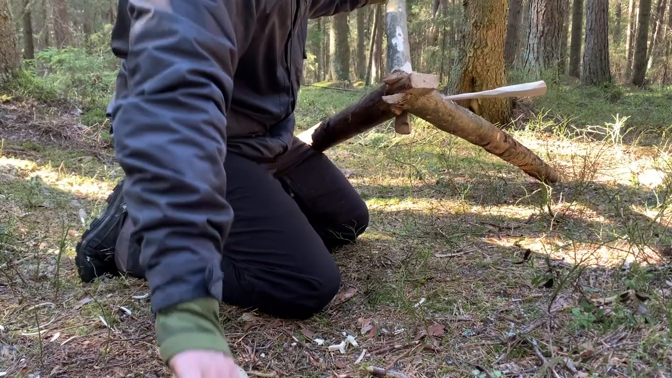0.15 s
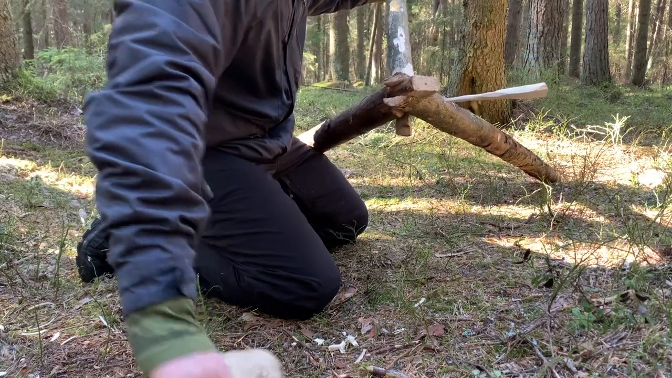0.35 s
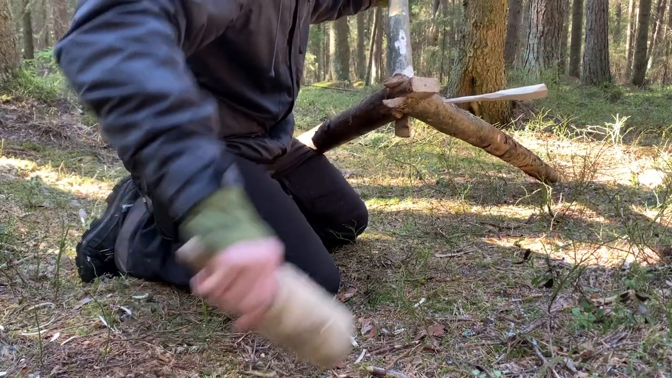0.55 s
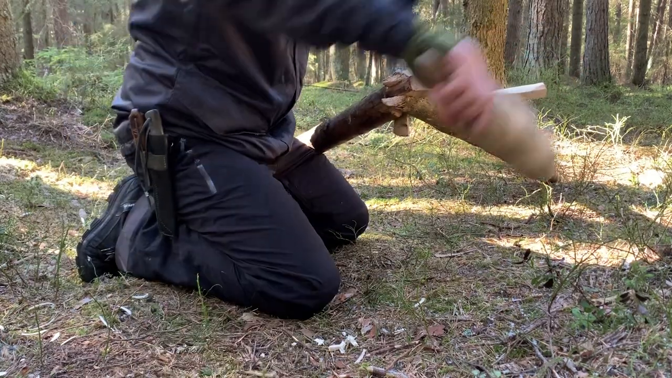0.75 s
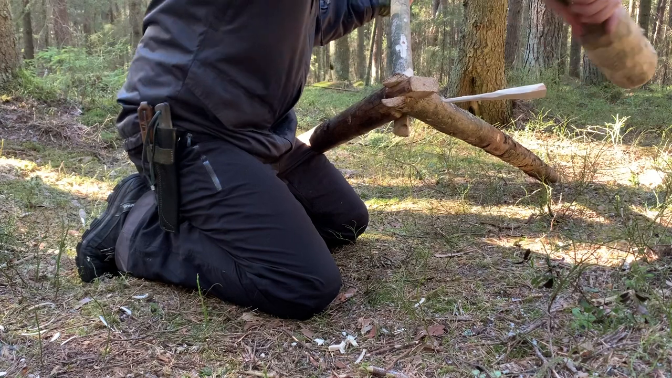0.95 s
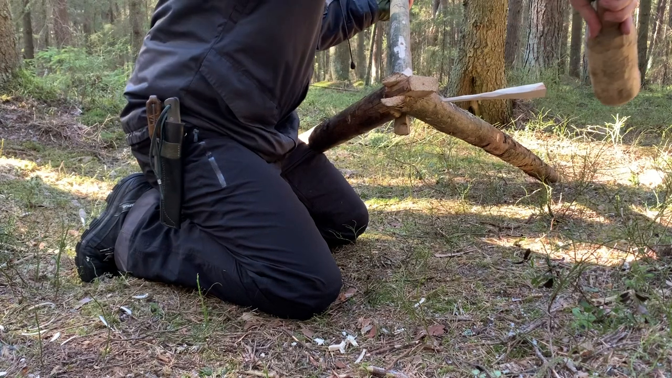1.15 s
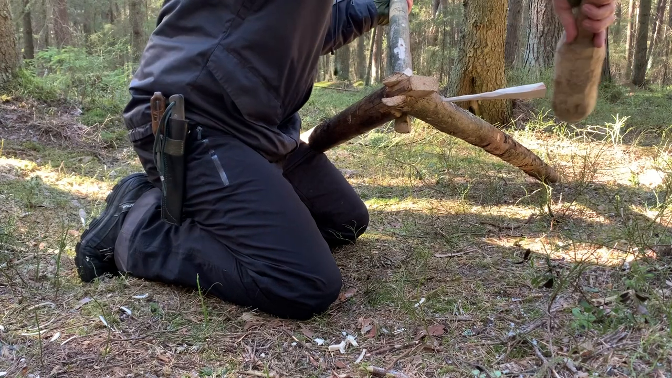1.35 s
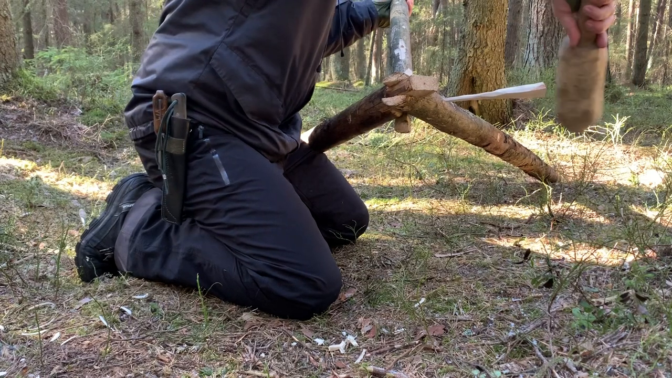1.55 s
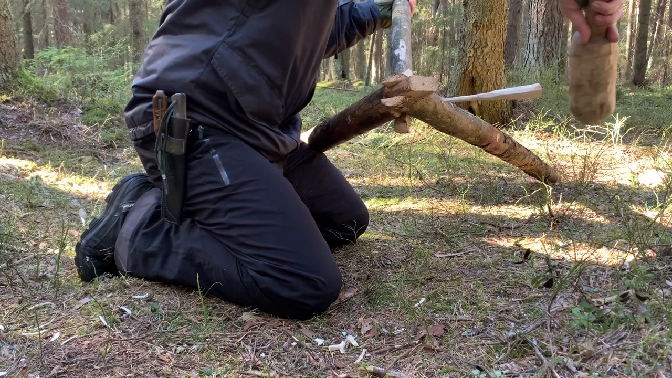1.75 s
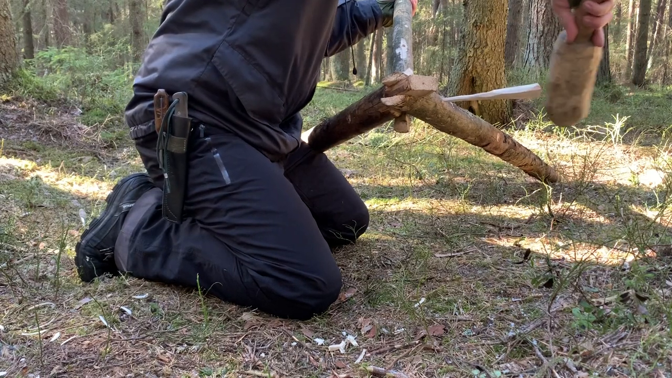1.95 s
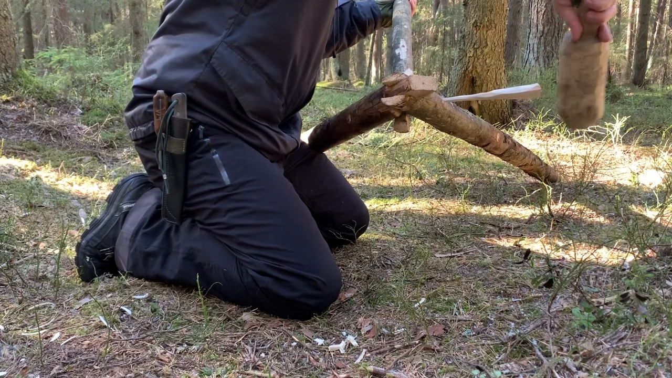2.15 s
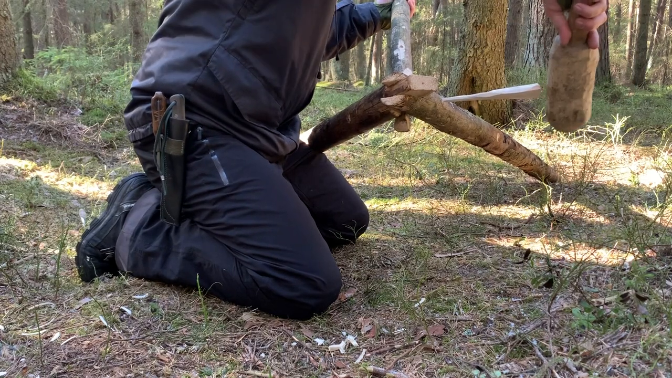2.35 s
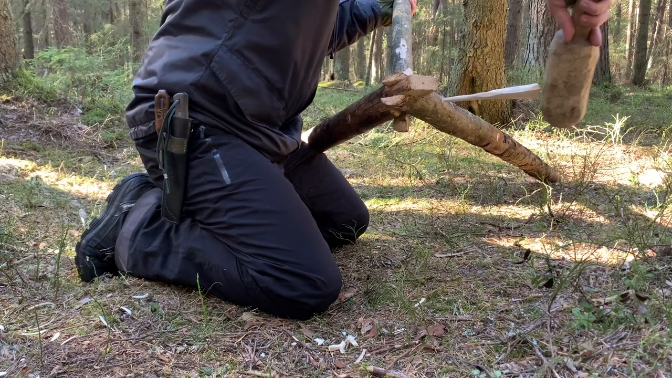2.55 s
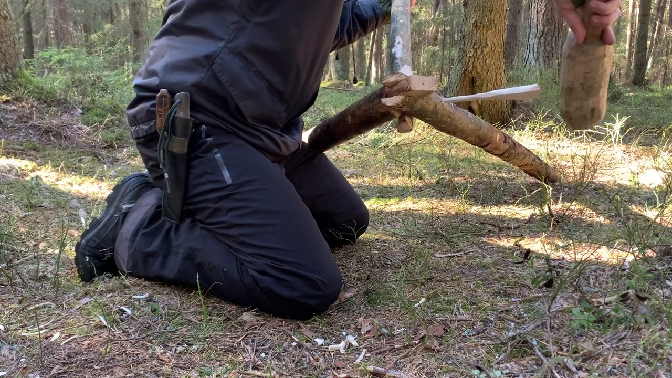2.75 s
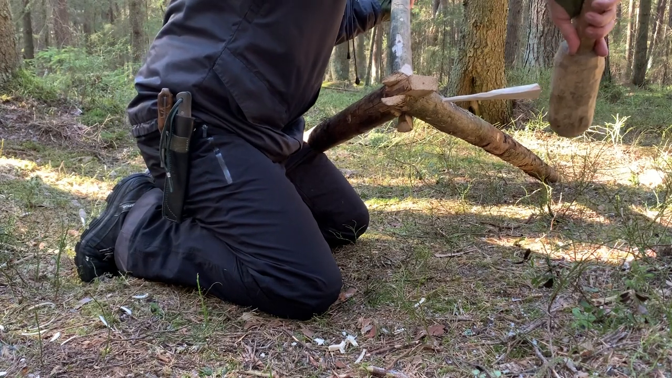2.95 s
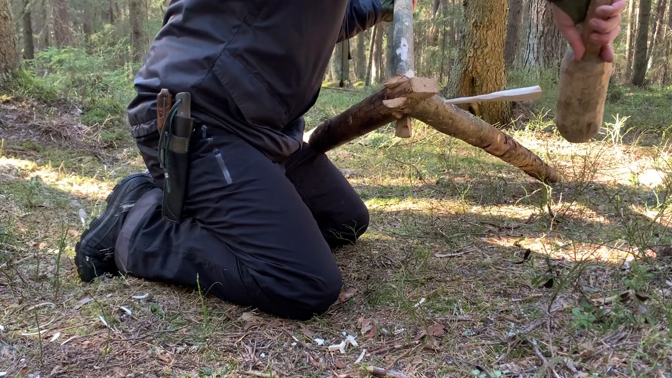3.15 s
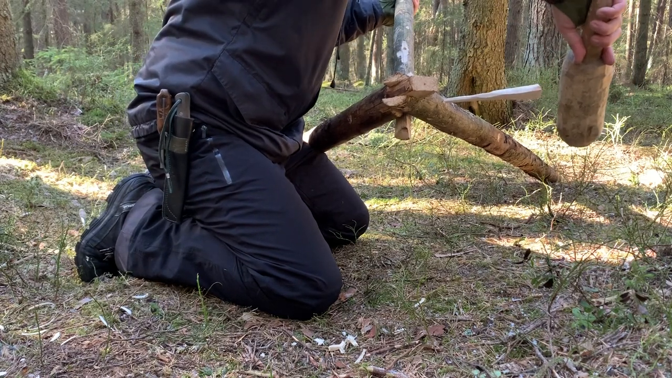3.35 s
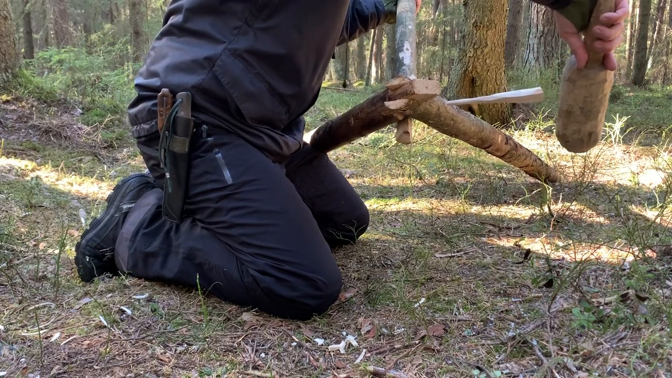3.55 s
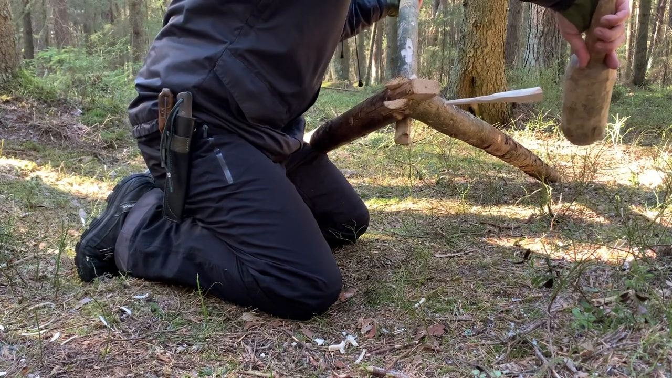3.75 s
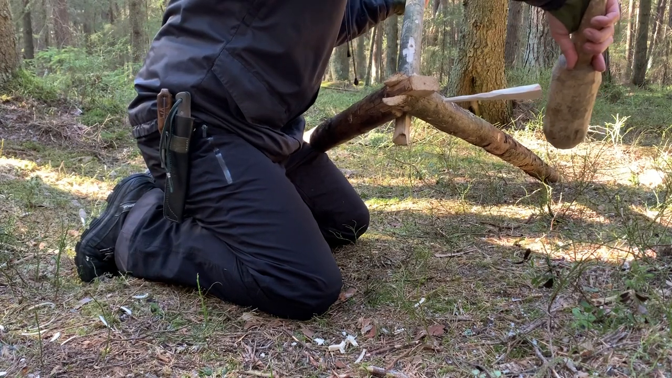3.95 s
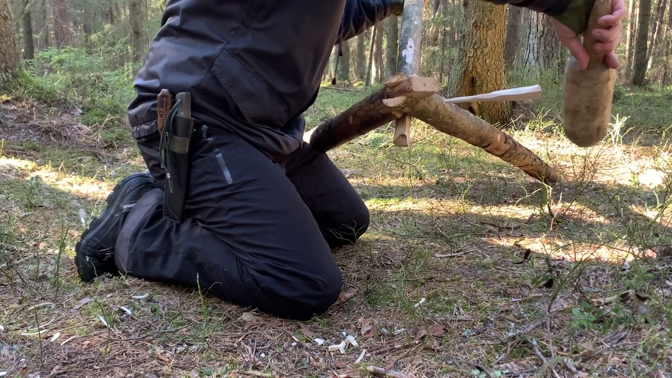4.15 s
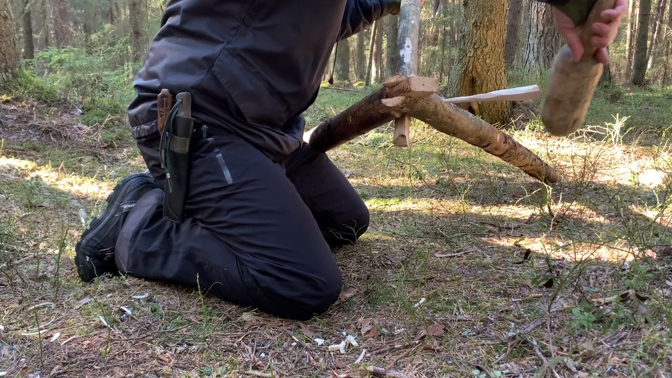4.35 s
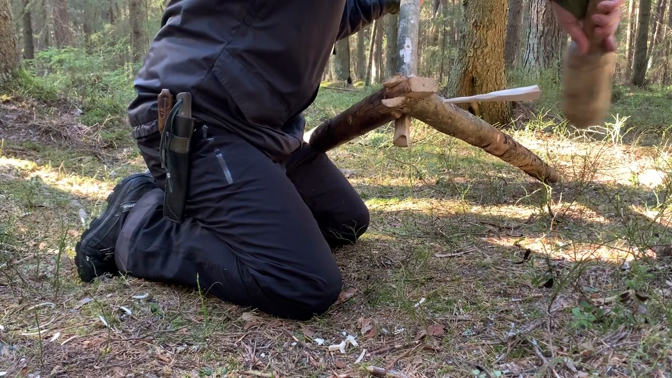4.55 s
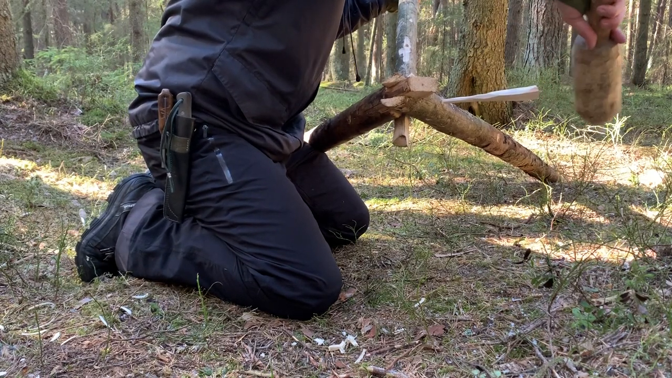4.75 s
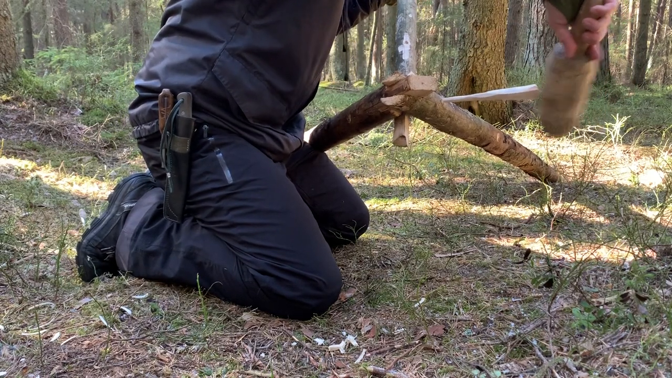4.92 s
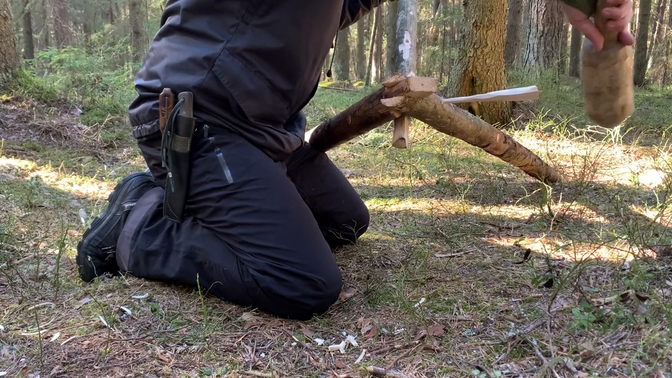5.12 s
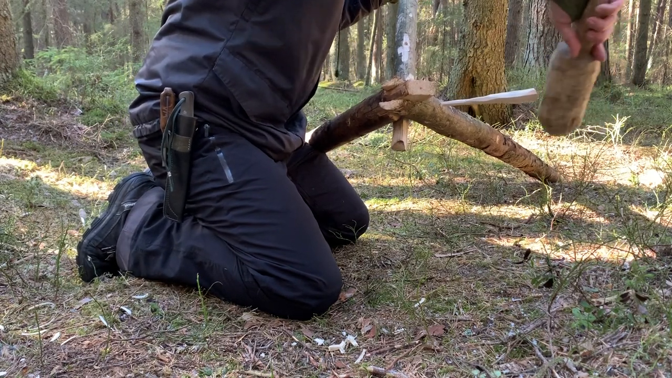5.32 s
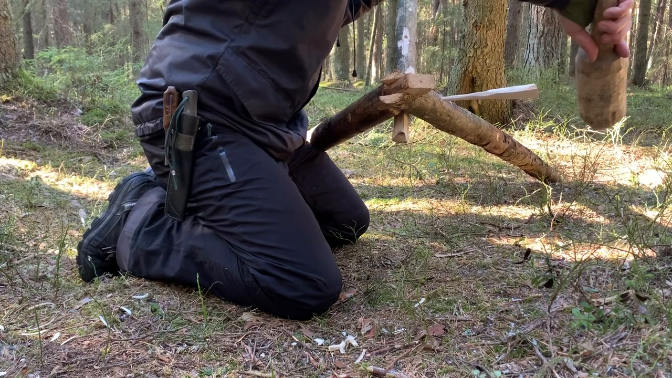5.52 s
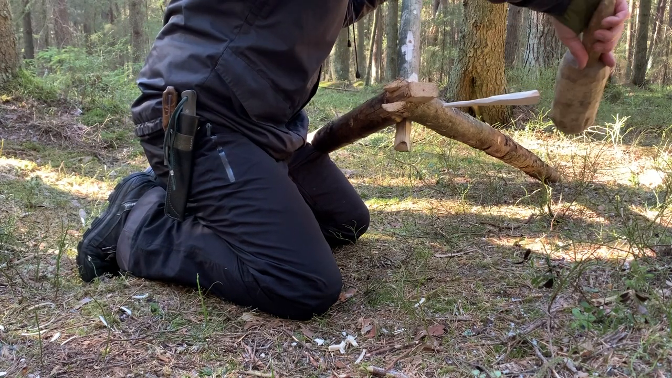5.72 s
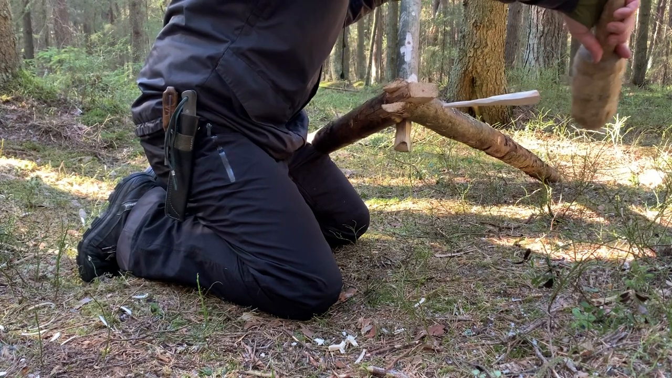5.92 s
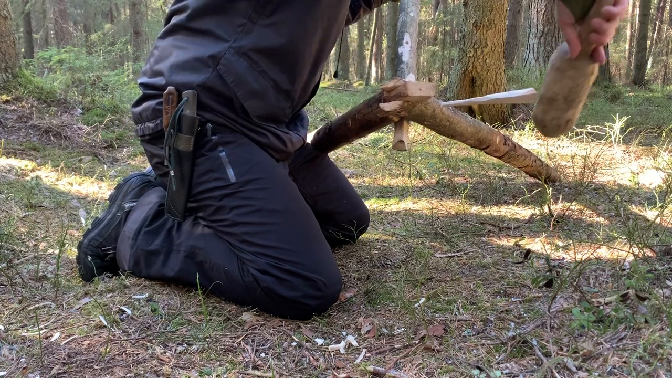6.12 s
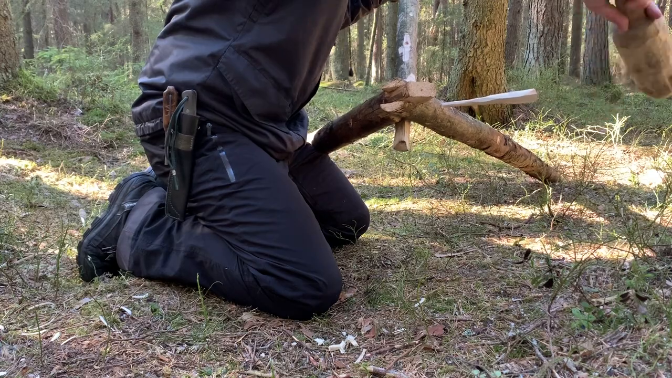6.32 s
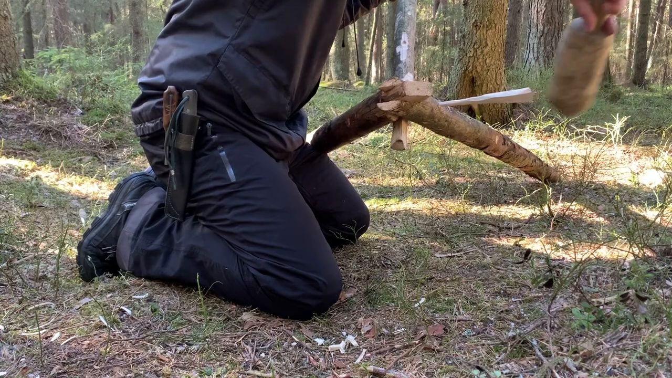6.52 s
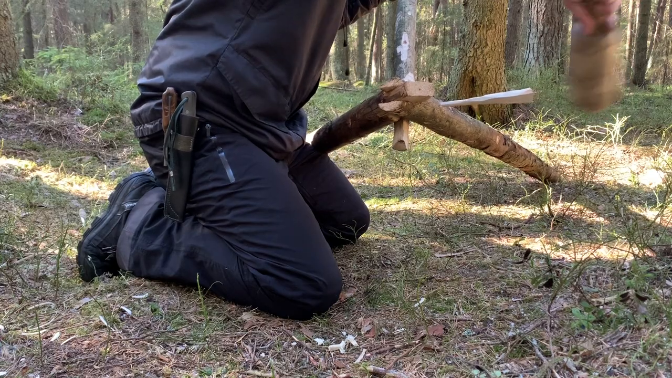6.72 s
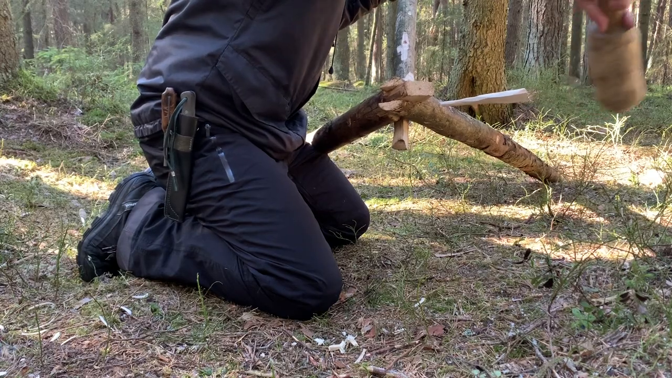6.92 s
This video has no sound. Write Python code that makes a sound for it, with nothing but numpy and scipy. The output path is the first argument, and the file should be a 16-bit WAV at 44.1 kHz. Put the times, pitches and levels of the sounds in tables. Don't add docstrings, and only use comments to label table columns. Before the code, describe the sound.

Cloth rustles and a knee thumps, then spaced wooden mallet taps grow into two loud, bright knocks among trees, with a faint distant bird.

```python
import sys
import numpy as np
from scipy import signal
from scipy.io import wavfile
from scipy.ndimage import uniform_filter1d

SR = 44100
rng = np.random.default_rng(int(sys.argv[2]) if len(sys.argv) > 2 else 0)


def boost(x):
    u = np.asarray(x, float) / 20
    return 10 ** u


def digitize_waveform(pressure):
    field = np.atleast_2d(pressure).T
    bounded = np.clip(field, -1, 1)
    quanta = np.round(bounded * 32767).astype(np.int16)
    wavfile.write(sys.argv[1], SR, quanta)


N = 312228

# f/Hz, level/dB per Hz
AIR = [(100, -18), (230, -26), (480, -21.5), (800, -27), (1500, -36), (2500, -43), (4500, -46),
       (6000, -48.5), (7500, -50), (12000, -52), (16000, -54)]
AIR_DB = -66.5
# t/s, push/thousandths of full scale, length/s
GUSTS = [(.44, -7.5, 0.092), (2.34, 4.5, 0.22), (3.063, 4.5, 0.14), (3.367, -9.5, 0.13), (3.604, 6.5, 0.19),
         (3.833, -7, .18), (4.29, 7, 0.11), (4.6, 5, 0.17), (5.414, 5.5, 0.17), (5.555, -6, 0.09),
         (5.991, 13.5, 0.092), (6.08, -27.5, 0.11), (6.2, 10, 0.15), (6.367, 13, 0.075),
         (6.486, -16.5, .11), (6.674, -13, 0.067), (6.897, -16, .13), (7.07, 23.5, 0.15)]
SWAY_DB = -59.5
# t/s, level/dB
HUM = [(0, -69), (.2, -62), (.7, -56), (1.42, -62.5), (2.2, -55.5), (2.75, -57.5), (3.15, -67.5),
       (3.8, -62.5), (5.0, -54.5), (7.08, -60.5)]
# t/s, peak level/dB, f/Hz, length/s
THUMPS = [(0.215, -32.5, 55.6, 0.049), (0.29, -43, 52.6, 0.066), (0.326, -45, 100, .03),
          (0.364, -23.5, 58, 0.034), (0.426, -33.5, 50, 0.038), (0.475, -35, 51, 0.045),
          (0.535, -39, 58.6, 0.041), (3.892, -49, 96, 0.04), (3.967, -43, 57, 0.028),
          (5.637, -36.5, 51, 0.042), (5.751, -48, 80.5, 0.046), (5.816, -44.5, 61, 0.023),
          (6.942, -42, 54.3, 0.035)]
# t/s, peak level/dB, length/s
MOVES = [(0.001, -65, 0.022), (0.045, -71, 0.11), (0.18, -71, 0.13), (0.358, -61.5, 0.046),
         (0.44, -66, 0.059), (0.647, -78, 0.06), (0.798, -71.5, .07), (1.008, -76.5, 0.13),
         (1.45, -86.5, 0.45), (2.364, -86.5, 0.39), (2.79, -92, .3), (3.167, -78, 0.065),
         (3.23, -79, 0.038), (3.453, -82, 0.086), (3.596, -86, .12), (3.84, -78.5, .07),
         (5.36, -80.5, 0.41), (5.524, -82, 0.033), (5.703, -76, 0.032), (6.397, -80, 0.056),
         (6.597, -85.5, .3), (6.751, -82, 0.097), (6.903, -82, .3)]
SLOPE_DB, RISE_SHARE, STILL_DB = 7, 0.87, -95.5
# f/Hz, level/dB per Hz
CLOTH = [(200, -5.5), (480, -2.5), (900, -8.5), (1320, -7), (1700, -10.5), (4200, -13), (6200, -26.5),
         (7600, -21), (11000, -29), (16000, -33.5)]
# t/s, peak level/dB, f/Hz, time to fall 60 dB/s
TICKS = [(.078, -40.5, 2230, 0.0038), (0.268, -56, 7500, 0.0053), (0.296, -56, 7500, 0.0055),
         (0.322, -45, 140, 0.9), (0.421, -50, 160, 0.27), (.638, -65, 7500, 0.0045),
         (.824, -61, 3000, .008), (.889, -51, 900, 0.0096), (3.049, -64, 7200, 0.0046),
         (3.42, -64, 1100, .015), (3.56, -63, 12000, 0.004), (3.665, -47, 250, 0.044),
         (3.715, -65, 2180, .01), (3.757, -62, 5300, 0.018), (3.815, -49, 350, 0.09),
         (3.857, -47, 450, 0.18), (4.353, -59.5, 7000, 0.015), (5.515, -40.5, 149, 0.066),
         (5.717, -55, 190, 0.074), (5.836, -53, 650, 0.016), (6.214, -54.5, 1450, 0.039),
         (6.41, -65, 11000, 0.013), (6.712, -69, 9950, 0.012), (6.727, -73, 9520, 0.0078)]
# t/s, level/dB, f/Hz, length/s
SQUEAKS = [(0.223, -70.5, 1290, 0.11), (0.339, -68, 1280, 0.062), (.42, -74, 1300, 0.12),
           (0.791, -68, 1334, 0.042), (2.348, -88, 4270, 0.31), (2.731, -86, 4300, 0.087),
           (3.117, -78, 1610, 0.036), (3.159, -78, 3720, 0.02), (3.185, -80, 1630, 0.072),
           (3.249, -82, 3700, .04), (3.254, -74, 1670, 0.027), (3.47, -79, 1620, 0.045),
           (3.695, -82, 1940, 0.1), (3.826, -73.5, 1620, 0.026), (3.864, -71.5, 1610, 0.043),
           (6.706, -78, 1934, 0.065)]
# start t/s, level/dB
BIRD = [
    (1.479, -75),
    (4.819, -75),
]
WHISTLE_S, ONSET_S = .4, .02
TOP_S, TOP_HZ, BEND_HZ_PER_S2, SAG_DB_PER_S = .13, 1842, 2100, 24
# t/s, mallet ring level/dB, then relative level/dB of poles, peg body, peg tip
BLOWS = [
    [(1.6218, -30.5, -25, -5.5, -22.5)],
    [(1.9264, -36, -22, -7, -15), (2.5146, -40.5, -11, -7.5, -9.5), (4.3254, -33, -13.5, -6.5, -18),
     (4.6376, -30, -4.5, -5, -13), (4.9688, -25.5, -3, -12, -28), (5.3063, -28, 0, -10.5, -25.5),
     (5.516, -55.5, 13, -3, -11), (6.1502, -27, -7, -6, -17.5)],
    [(6.4846, -11, -18, -7.5, -14)],
    [(6.8009, -15.5, -14.5, -3.5, -2)],
]
# f/Hz, time to fall 60 dB/s, level/dB for dry tap, dull blows, square knock, edge knock
MALLET = [(676.3, 0.063, -7.5, -6, -11, -9.5), (900, 0.069, -18, -8, -32, -11),
          (1052, 0.012, -14, -0.5, -13.5, 7), (1260, .012, 0, -2, 3.5, 2),
          (1395, 0.017, -12, -18, -11.5, -24), (1567, 0.014, 0.5, 1.5, -10, 0.5),
          (1836, 0.012, 3, -25, -17.5, 0.5)]
POLES = [(170, 0.034, -10, -7.5, -12, -23), (201, 0.017, -12, -11, -17, -14),
         (281, 0.02, -16, -1, -29, -7.5), (392.4, 0.026, 5, -1.5, -10, -8), (450, 0.025, 11, 2, 2.5, -18.5),
         (536, 0.011, -17, 2.5, 3, 4)]
PEG = [(2282, 0.024, -12, -5.5, -8.5, -7), (2570, 0.037, -9, -10, -8.5, -9), (2980, 0.014, -9, -9, 6, 2.5),
       (3400, 0.0075, -6, -7, -0.5, 7), (4030, 0.0089, -14, -13, -4.5, -2), (4670, 0.015, -7, -23, -29, -8),
       (5300, 0.015, -32, -45, -16, -24)]
TIP = [(6650, .008, -2, -8, -1.5, -8), (6970, 0.0072, -2, -4, -2, -14), (7890, 0.0064, 3, 3.5, 5, 10),
       (8570, 0.0087, 1, -2, -11, -23.5), (9260, 0.0061, -10, -3.5, -2.5, -9),
       (10400, 0.005, -11, -6.5, -8.5, -8), (11420, 0.0074, -20, -11, -5.5, -14),
       (13500, .006, -22, -14, -24.5, -36.5)]
SHAKE = [1.25, 3.3, 0.3, 0.43]
MISS_DB, DETUNE = 1.2, .005
CHATTER_MS = 3.48
CHATTER_MS_PER_DB = 0.06
SEATS_FROM_S, SEATING_MS_PER_S = 4.48, 0.62
# t/s, thrum of the longest pole level/dB, its f/Hz,
# wave through the soil level/dB, rocking of the stand/0-1
THRUMS = [(1.623, -50, 223, -75, 0.23), (1.927, -49.5, 228, -71, 0.8), (2.513, -51.5, 221, -75, 0.6),
          (4.326, -54, 228.5, -47.5, 0.87), (4.635, -45.5, 231.5, -44.5, 0.89),
          (4.968, -37.5, 240, -43, 0.98), (5.305, -42, 228, -46, 1), (6.15, -44.5, 228, -43, 0.7),
          (6.485, -39, 245, -42, 0.58), (6.799, -43, 252, -52, 0.47)]
ROCK_S = .066
SOIL_FROM_HZ, SOIL_TO_HZ, SOIL_SINK_S = 122, 54.8, 0.23
ROCK_DROP_HZ = 41
SOIL_HOLD_S, SOIL_FADE_DB_PER_S, JOLT_DB, JOLT_S = 0.075, 105, 1.5, 0.0027
# f/Hz, time to fall 60 dB/s
TRUNKS = [(200, .25), (700, 0.5), (2000, 0.85), (5000, 0.92), (12000, 0.93)]
# delay t/s, level/dB
NEAR = [
    (.004, -15.5),
    (.011, -26),
    (.0162, -22),
    (.04, -33.5),
]
EDGE_HZ = 16300


def evened(x):
    return x / np.sqrt(np.mean(x ** 2) + 1e-20)


def read(points, hz):
    f, value = np.transpose(points)
    return np.interp(np.log(hz + 1), np.log(f + 1), value)


def curve(rows):
    s, value = np.transpose(rows)
    return np.interp(np.arange(N) / SR, s, value)


def add(mix, s, sound):
    part = mix[round(s * SR):][:len(sound)]
    part += sound[:len(part)]


def band(x, lo_hz, hi_hz):
    return signal.sosfiltfilt(signal.butter(2, [lo_hz, hi_hz], "band", fs=SR, output="sos"), x)


def noise(spectrum, patchy_db, flicker_db):
    frames, hz = N // 128 + 5, np.fft.rfftfreq(512, 1 / SR)
    a, b, patches = rng.standard_normal((frames, 257, 3)).T
    patches = uniform_filter1d(patches, size=6, axis=0)
    patches = evened(uniform_filter1d(patches, size=20, axis=1))
    flicker = evened(uniform_filter1d(rng.standard_normal(frames), size=3))
    level_db = read(spectrum, hz)[:, None] + patchy_db * patches + flicker_db * flicker
    z = (a + 1j * b) * boost(level_db)
    z[:1] = 0
    return signal.istft(z, nperseg=512, noverlap=384)[1][:N]


def forest_air():
    return boost(AIR_DB) * evened(noise(AIR, 0.96, 0.37))


def breeze():
    t = np.arange(N) / SR
    lean = sum(push * np.exp(-2.8 * ((t - s) / length) ** 2) for s, push, length in GUSTS) / 1000
    lean = lean + boost(SWAY_DB) * evened(band(rng.standard_normal(N), 1.8, 3.7))
    flutter = evened(band(rng.standard_normal(N), 4.4, 30))
    return lean + boost(-63) * (1 + 60 * abs(lean)) * flutter


def ground():
    out = boost(curve(HUM)) * evened(band(rng.standard_normal(N), 38, 63.4))
    t = np.arange(-.12, .2, 1 / SR)
    for (s, db, hz, length), turn in zip(THUMPS, rng.random(len(THUMPS))):
        swell = np.exp(-2.8 * (t / length) ** 2)
        add(out, s + t[0], boost(db) * swell * np.cos(2 * np.pi * (hz * t + turn)))
    return out


def effort():
    t = np.arange(0, N + 64, 64) / SR
    power = boost(2 * STILL_DB)
    for s, db, length in MOVES:
        away_from_peak = np.maximum(t - s, (s - t) / RISE_SHARE) / length
        power = power + boost(2 * (db - SLOPE_DB * away_from_peak))
    return np.interp(np.arange(N) / SR, t, np.sqrt(power))


def rustle():
    hiss = noise(CLOTH, 0.61, 2.4)
    catches = rng.exponential(1, N) * (rng.random(N) < 120 / SR)
    catches = uniform_filter1d(catches, size=90) * 90
    hiss = hiss + (0.84 + 0.61 * catches) * band(hiss, 5000, 15000)
    return effort() * hiss / band(hiss, 2500, 15000).std()


def twigs():
    out, t = np.zeros(N), np.arange(4000) / SR
    for (s, db, hz, t60), puff in zip(TICKS, rng.standard_normal((len(TICKS), 4000))):
        tick = band(puff, hz * 0.33, hz * 1.39) * boost(-60 * t / t60) * np.minimum(t / 0.0021, 1)
        add(out, s, boost(db) * tick / abs(tick).max())
    return out


def squeaks():
    out, t = np.zeros(N), np.arange(-9000, 9000) / SR
    for (s, db, hz, length), rub in zip(SQUEAKS, rng.standard_normal((len(SQUEAKS), 18000))):
        tone = evened(band(rub, hz * .955, hz * 1.045))
        add(out, s + t[0], boost(db) * tone * np.exp(-2.8 * (t / length) ** 2))
    return out


def bird():
    out, t = np.zeros(N), np.arange(0, WHISTLE_S, 1 / SR)
    hz = TOP_HZ - BEND_HZ_PER_S2 * (t - TOP_S) ** 2
    shape = np.clip(np.minimum(t, WHISTLE_S - t) / ONSET_S, 0, 1)
    shape = shape * boost(-SAG_DB_PER_S * np.maximum(t - TOP_S, 0))
    for s, db in BIRD:
        add(out, s, boost(db) * shape * np.sin(2 * np.pi * np.cumsum(hz) / SR))
    for delay_s, db in ((.045, -38), (.11, -4), (.17, -19.5)):
        add(out, delay_s, boost(db) * out.copy())
    return out


def crack(lo_hz, hi_hz, shake_s, chance):
    u = np.arange(len(chance)) / SR / shake_s
    return .5 * evened(band(chance, lo_hz, hi_hz)) * np.sqrt(u) * np.exp(-u)


def ring(modes, landing, shake_s, chance):
    t, sound = np.arange(9000) / SR, 0
    u = t[:3000] / shake_s
    push = np.sqrt(u) * np.exp(-u)
    draws = zip(modes, chance, chance[20:], chance[40:])
    for k, ((hz, t60, *db), miss, detune, turn) in enumerate(draws):
        chatter = evened(uniform_filter1d(np.roll(chance[100:], 370 * k), size=24))
        swell = signal.fftconvolve(boost(-60 * t / t60), (0.51 + chatter) * push)[:len(t)]
        tone = np.cos(2 * np.pi * (hz * (1 + DETUNE * detune) * t + turn))
        sound = sound + boost(db[landing] + MISS_DB * miss) * swell / abs(swell).max() * tone
    return sound


def blows():
    near, away = np.zeros((2, N))
    click = signal.unit_impulse(2000, 600)
    parts = (MALLET, POLES, PEG, TIP)
    cracks_db, aways_db = (-4.0, -11, -2.5, -0.5), (-2.0, 8.5, -4.5, -9.5)
    for landing, rows in enumerate(BLOWS):
        for (s, db, *shares_db), draws in zip(rows, rng.standard_normal((len(rows), 4, 3100))):
            chatter_ms = CHATTER_MS + CHATTER_MS_PER_DB * min(shares_db[0], 0)
            chatter_ms -= SEATING_MS_PER_S * max(s - SEATS_FROM_S, 0)
            chatter_s = max(chatter_ms, .5) / 1000
            settings = zip(parts, SHAKE, (0, *shares_db), draws, cracks_db, aways_db)
            for modes, longer, share_db, draw, crack_db, away_db in settings:
                shake_s = chatter_s * longer
                rung = boost(db + share_db - 5.5) * ring(modes, landing, shake_s, draw)
                lo_hz, hi_hz = modes[0][0] * 0.79, modes[-1][0] * 0.98
                spit = crack(lo_hz, hi_hz, shake_s * 2.97, draw[::-1])
                add(near, s, rung)
                add(near, s, boost(db + share_db + crack_db) * spit)
                spread = band(click, lo_hz, hi_hz)
                strength = np.linalg.norm(rung) / np.linalg.norm(spread)
                add(away, s - 600 / SR, boost(away_db) * spread * strength)
    return near, away


def thrum():
    out, t = np.zeros(N), np.arange(12000) / SR
    for s, db, hz, *_ in THRUMS:
        swell = boost(db + 5 - 60 * t / 0.17) * (1 - np.exp(-t / 0.019))
        add(out, s, swell * np.sin(2 * np.pi * hz * t))
    return out


def soil():
    out, t = np.zeros(N), np.arange(16000) / SR
    fade = boost(-SOIL_FADE_DB_PER_S * np.maximum(t - SOIL_HOLD_S, 0))
    jolt = boost(JOLT_DB) * np.exp(-t / JOLT_S)
    for s, _, _, db, rock in THRUMS:
        start_hz = SOIL_FROM_HZ - ROCK_DROP_HZ * rock
        hz = SOIL_TO_HZ + (start_hz - SOIL_TO_HZ) * np.exp(-t / SOIL_SINK_S)
        wave = np.sin(2 * np.pi * np.cumsum(hz) / SR) * fade
        beats = 1 - np.clip(rock, 0, 1) * np.sin(np.pi * t / ROCK_S) ** 2
        add(out, s, boost(db) * wave * (beats + jolt))
    return out


def forest(x):
    taps = np.zeros(SR)
    at = np.arange(400, SR - 20, 20) + rng.integers(0, 20, (SR - 401) // 20)
    taps[at] = rng.choice([-1., 1.], len(at))
    hz, t, z = signal.stft(taps, SR, nperseg=256)
    slow = boost(-60 * t / read(TRUNKS, hz)[:, None])
    early = boost(20.5 - 60 * t / 0.11)
    tail = signal.istft(z * (slow + early), SR, nperseg=256)[1]
    tail *= boost(-18.5) / np.linalg.norm(tail)
    bark = rng.standard_normal((len(NEAR), 260)) * np.hanning(260)
    for (s, db), smear in zip(NEAR, bark):
        add(tail, s, boost(db) * smear / np.linalg.norm(smear))
    dull = signal.lfilter(*signal.butter(1, 7000., fs=SR), x)
    return signal.fftconvolve(dull, tail)[:N]


def scene():
    near, away = blows()
    near += twigs()
    scattered = forest(away + .17 * near)
    air = forest_air()
    felt = thrum() + soil()
    low = ground() + breeze()
    clothes = rustle() + squeaks()
    return (near + scattered + felt + low + clothes + bird() + air)[None]


def roll_off(x):
    return signal.sosfilt(signal.butter(12, 16800, fs=SR, output="sos"), x)


def record(dry):
    low_pass = signal.firwin(255, EDGE_HZ, window=("kaiser", 9), fs=SR)
    limited = signal.oaconvolve(dry, low_pass[None], "same")
    return roll_off(limited)


dry = scene()
out = record(dry)
digitize_waveform(out)
```